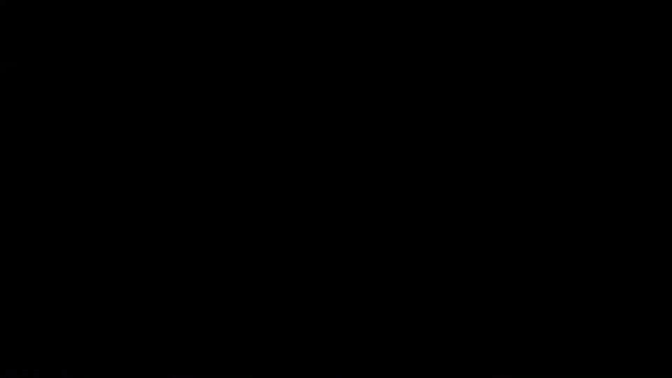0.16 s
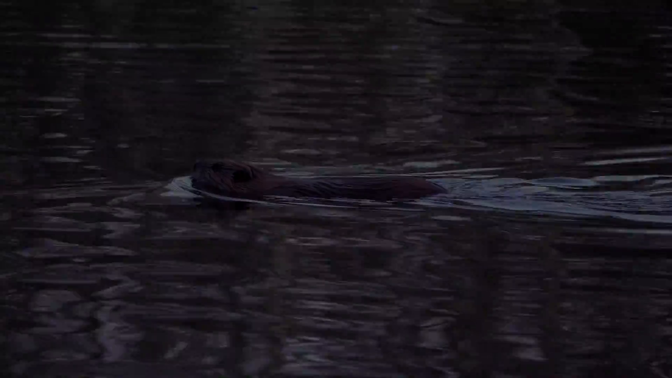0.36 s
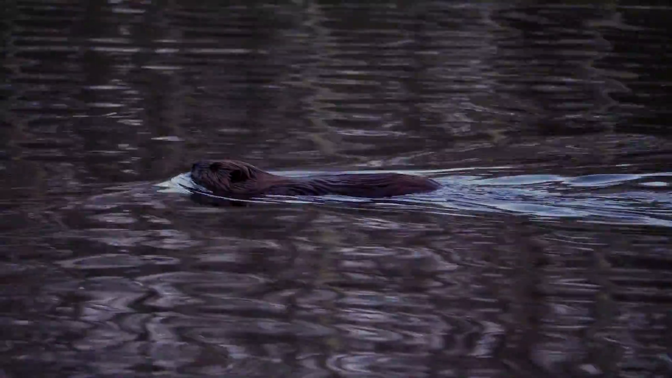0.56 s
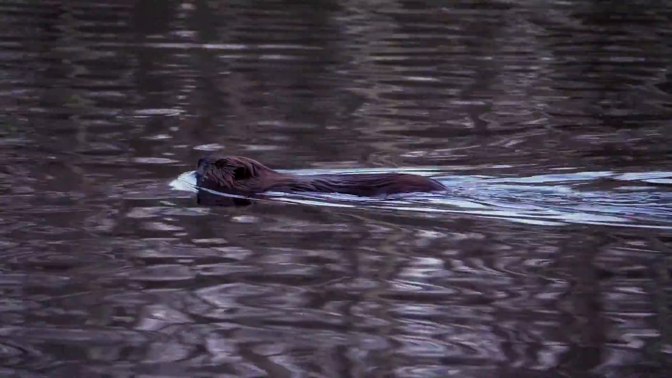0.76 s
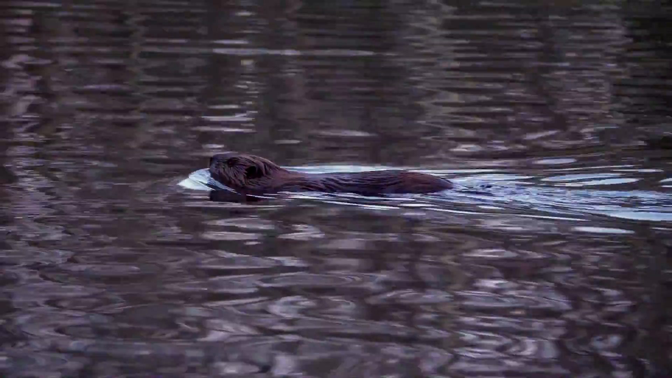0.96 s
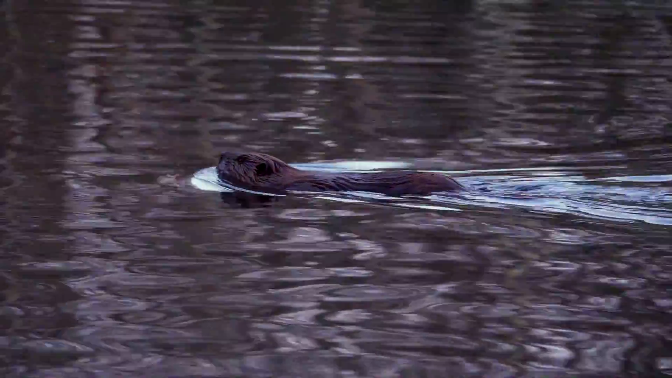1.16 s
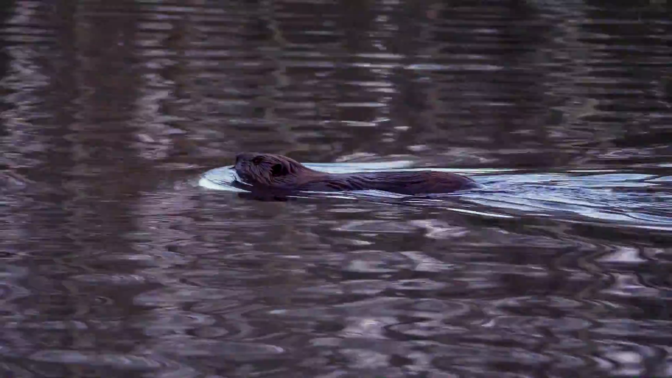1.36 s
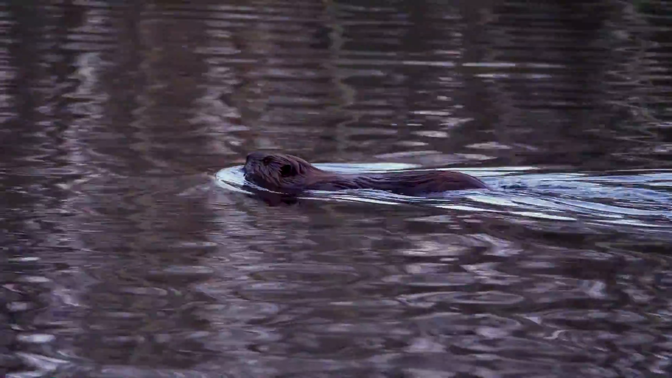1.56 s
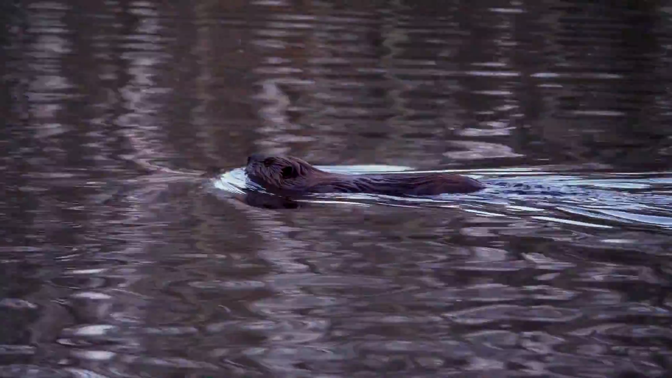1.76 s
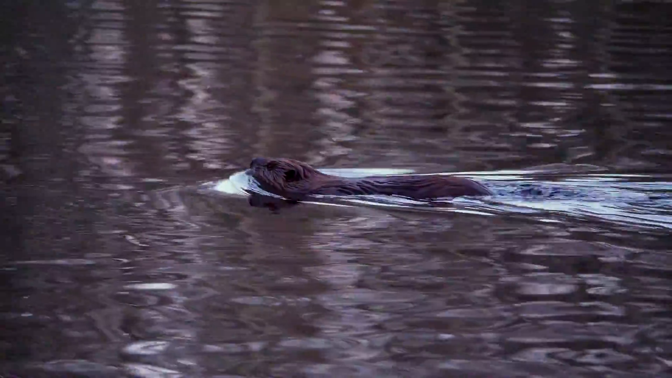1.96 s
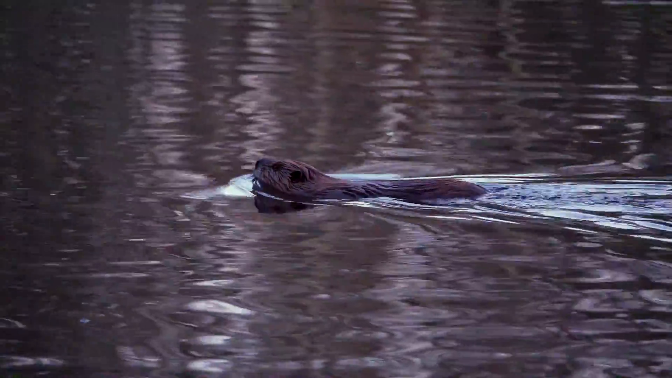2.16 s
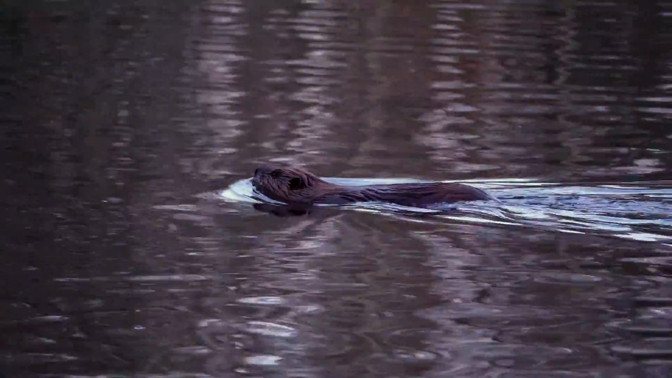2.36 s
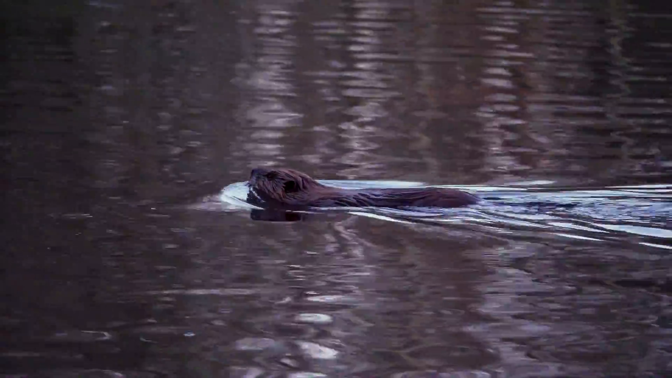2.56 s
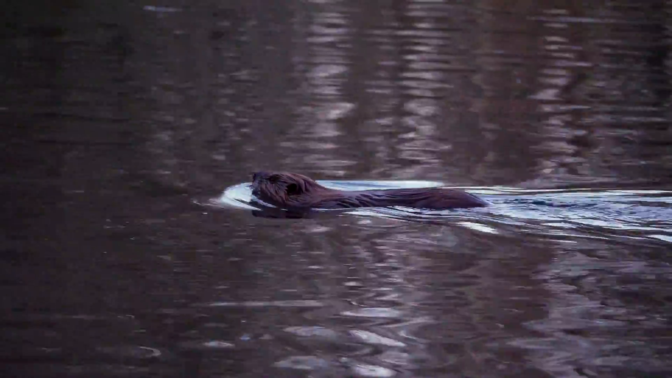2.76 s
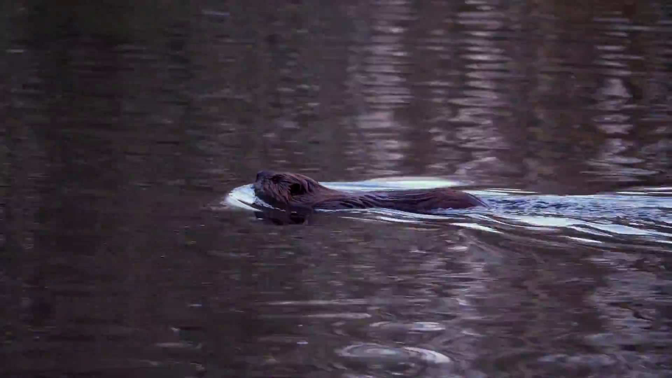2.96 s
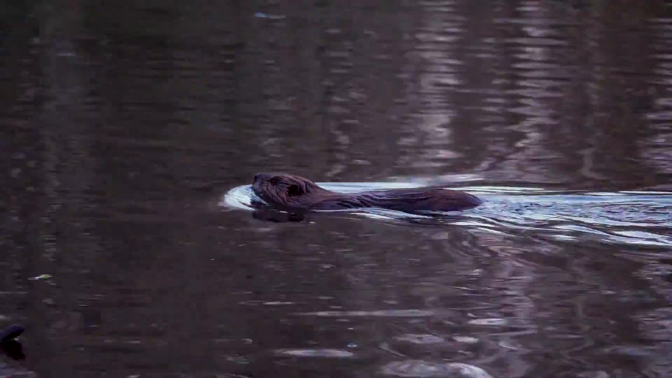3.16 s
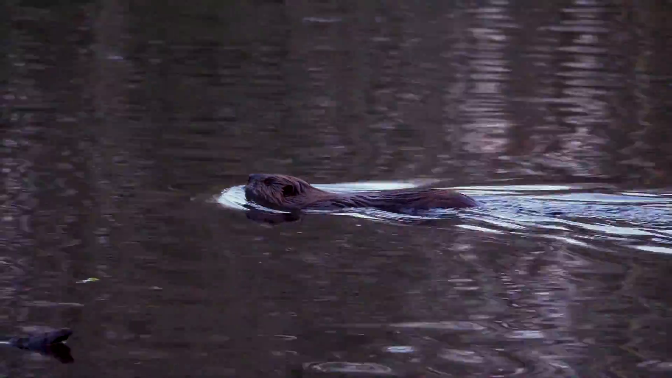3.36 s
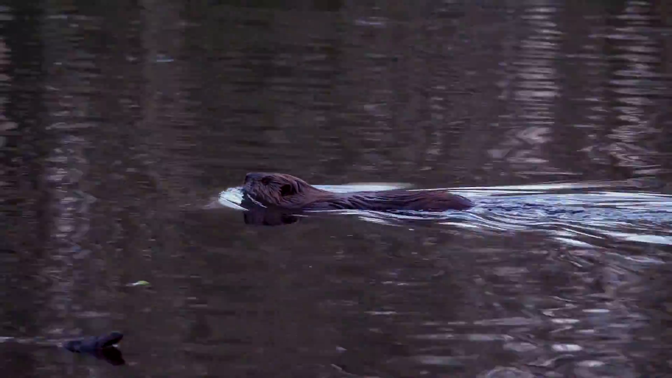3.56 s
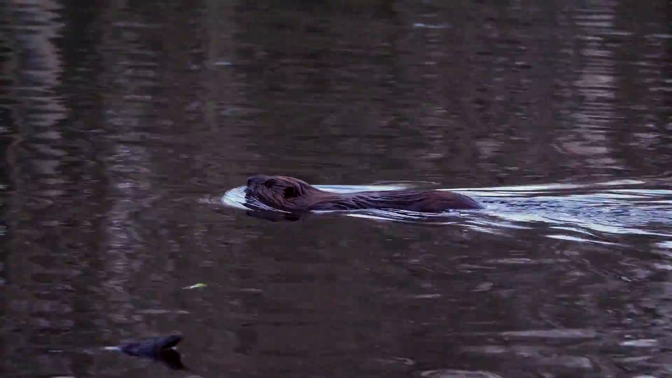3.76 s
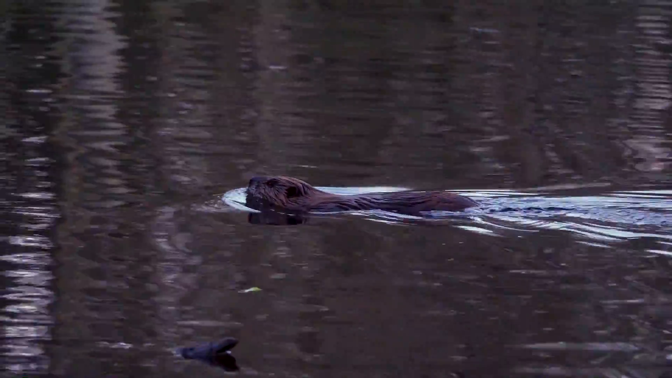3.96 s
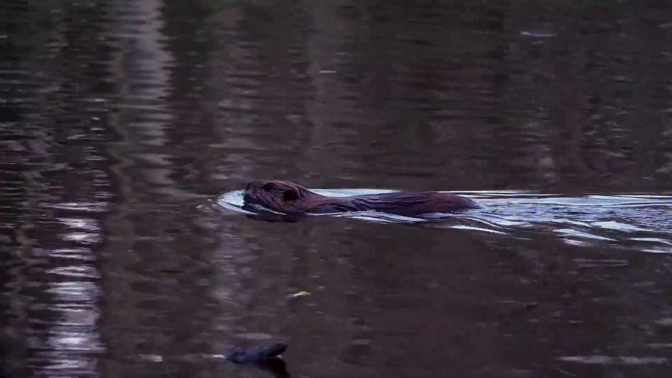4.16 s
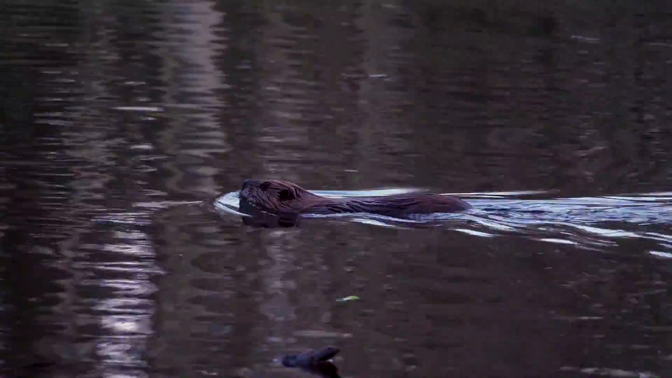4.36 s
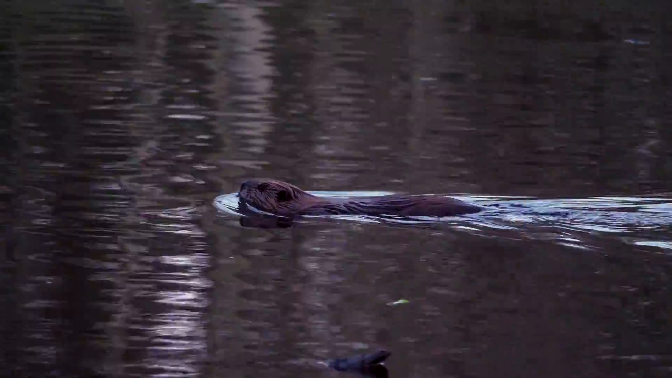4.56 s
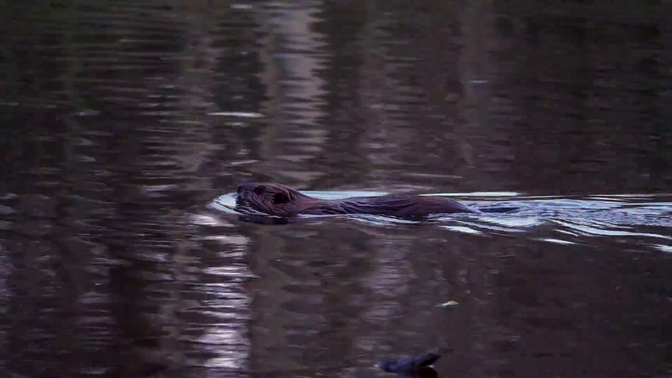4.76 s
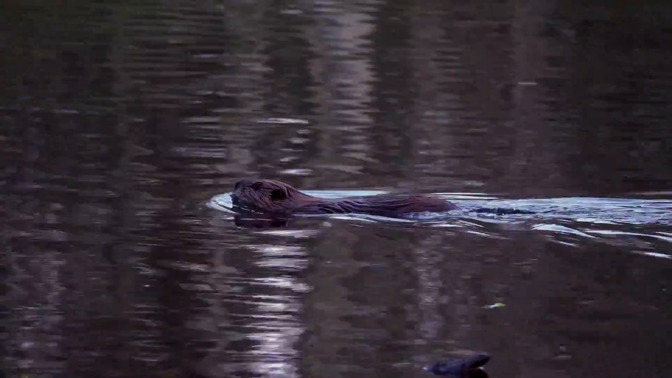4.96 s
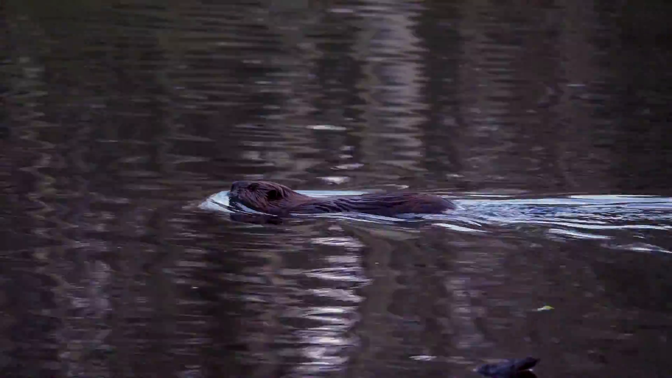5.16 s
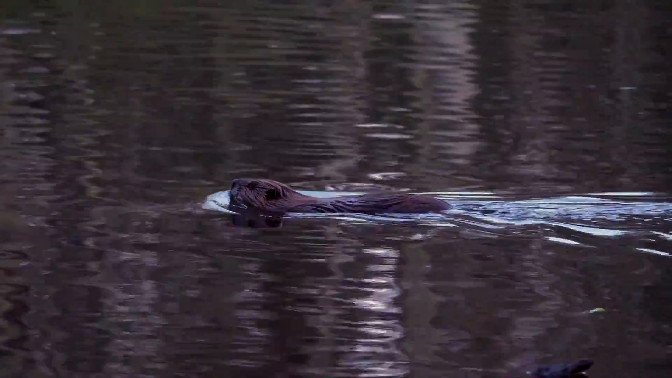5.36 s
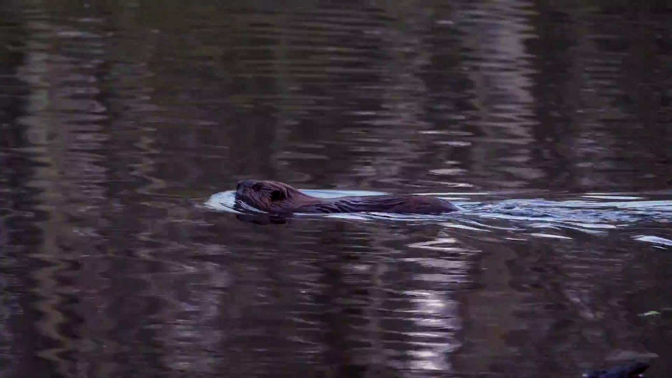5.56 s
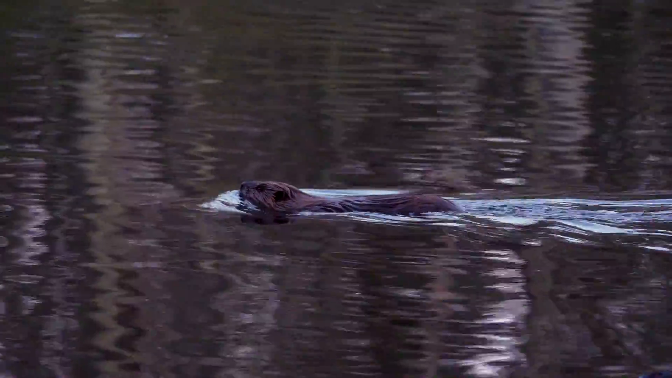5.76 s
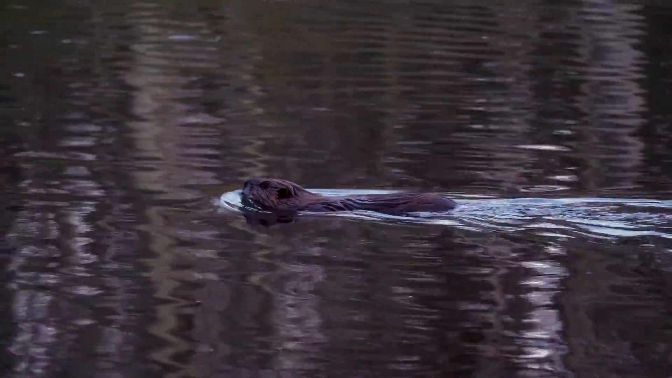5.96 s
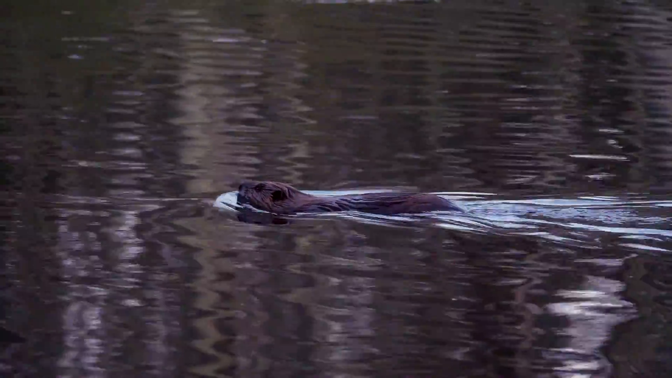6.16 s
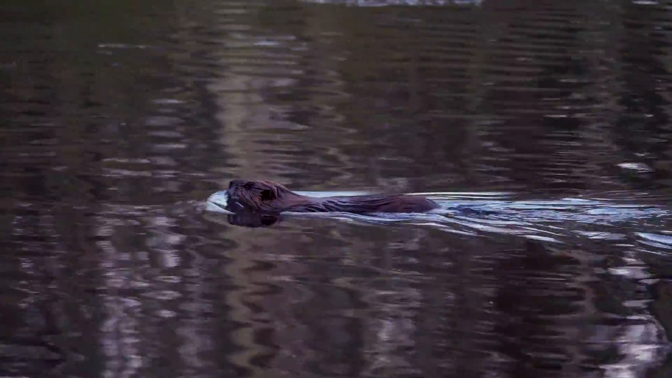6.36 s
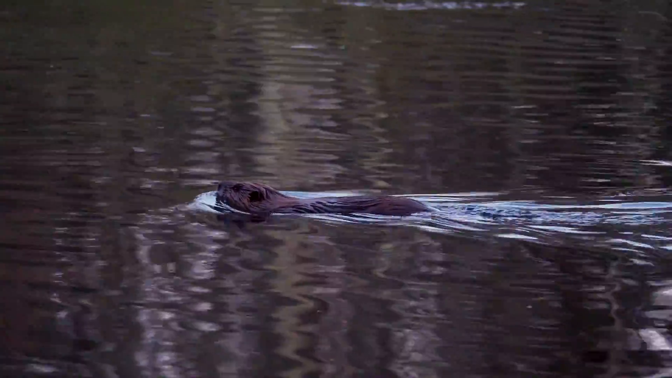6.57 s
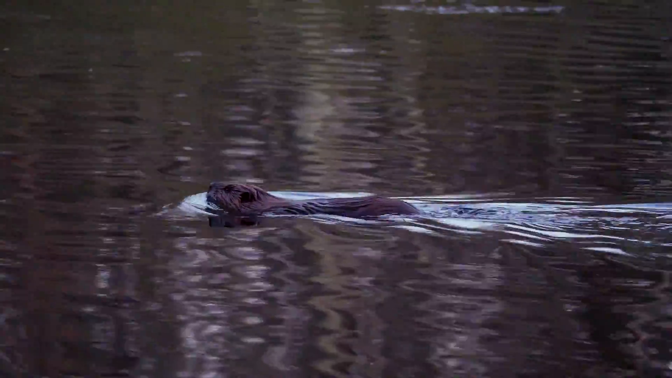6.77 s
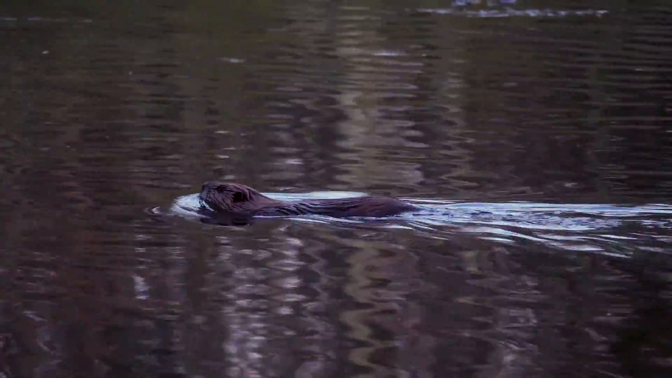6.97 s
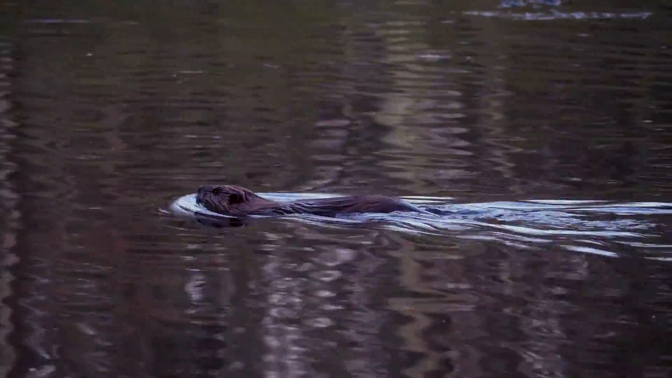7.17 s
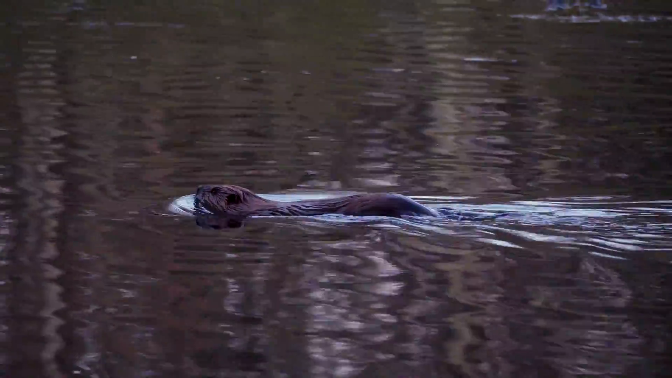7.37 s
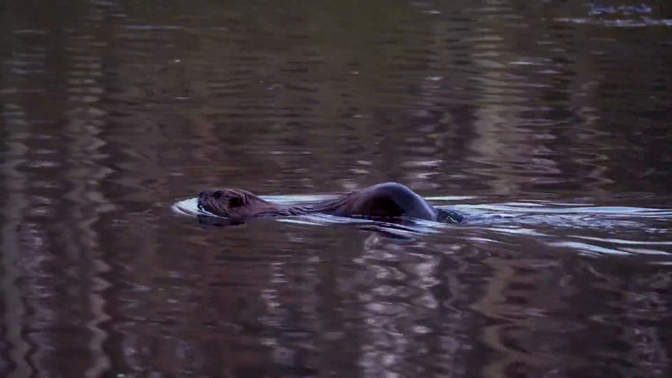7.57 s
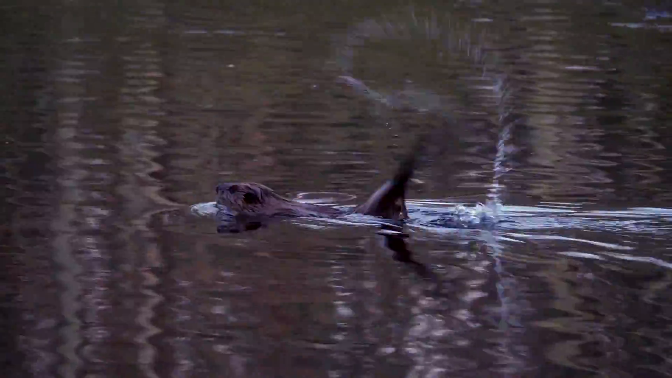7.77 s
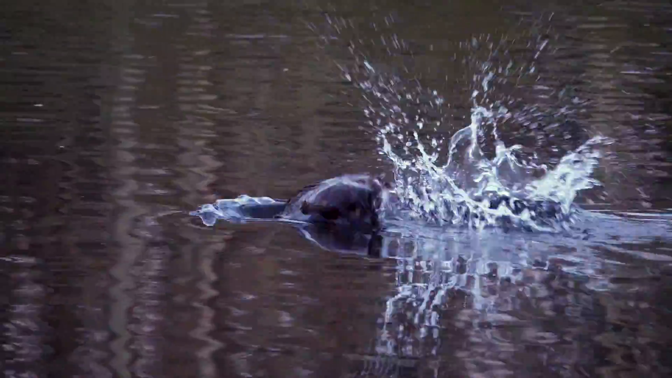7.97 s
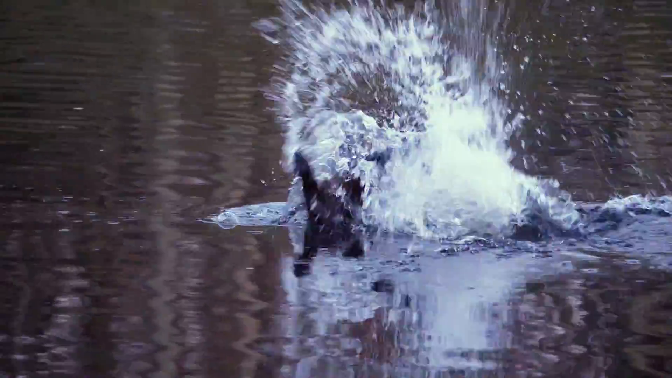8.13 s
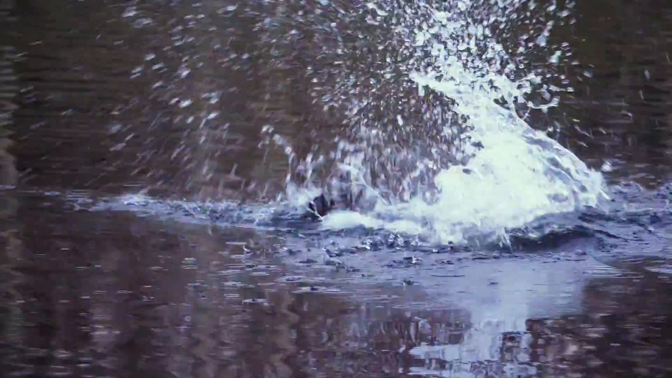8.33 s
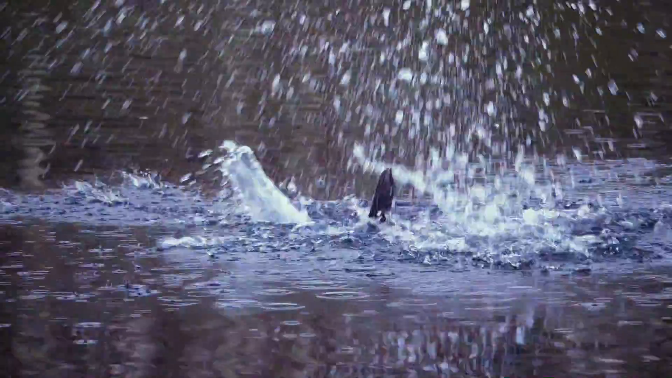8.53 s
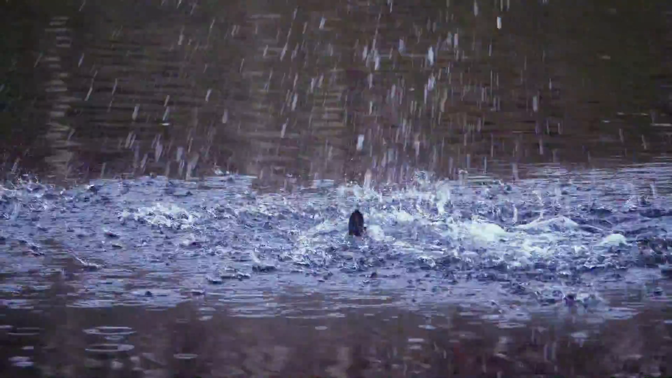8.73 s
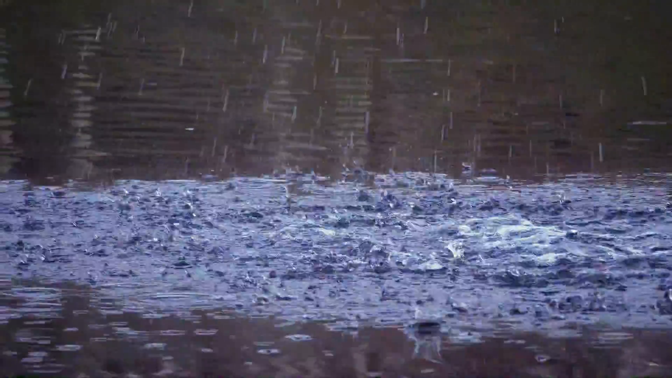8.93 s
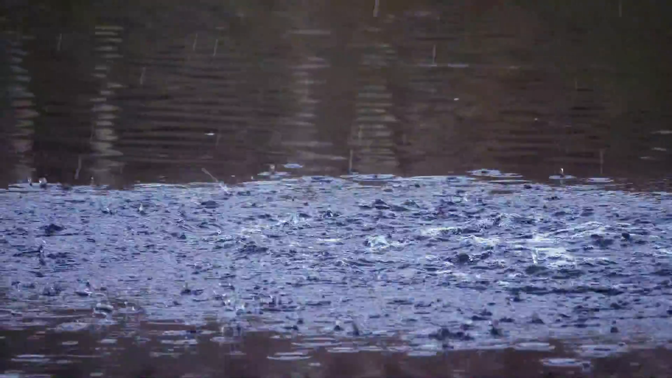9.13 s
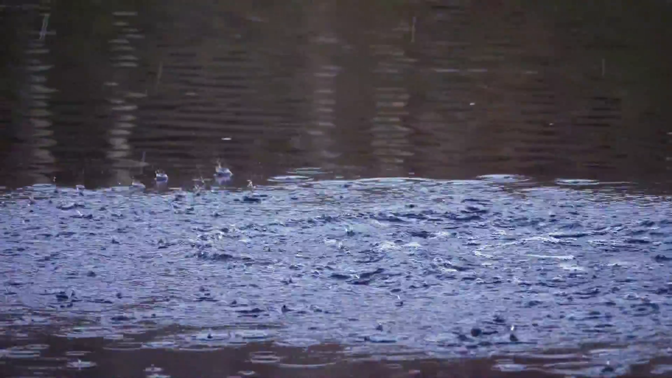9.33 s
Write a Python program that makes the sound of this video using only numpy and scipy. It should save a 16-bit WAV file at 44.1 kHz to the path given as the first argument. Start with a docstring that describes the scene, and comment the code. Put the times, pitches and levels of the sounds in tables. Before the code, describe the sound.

A soft outdoor hush lies over a woodland pond, with faint, lightly echoing birds, mostly to the left. Thin, held whistles sound through the first two seconds, and short reedy phrases come at about 0.7, 2.7, 4.1 and 5.7 seconds. A trill runs from 1.9 to 3.9 seconds, then one long whistle on the right lasts until 5. Three short buzzes, more whistles and a high trill follow between 5.7 and 7.5. Tiny plops dot the quiet. At 7.8 water trickles, and just before 8 a beaver's tail smacks the pond, loud, sharp, near and centred. A low, gulping plunge and a surge of splashing follow at 8.2, then a second loud smack at 8.45. The thrown water rains back in bright drops and bubbles, thinning toward the end at about 9.4 seconds.

```python
"""Beaver on a woodland pond

A beaver lifts its tail, smacks the pond, plunges and smacks again; the thrown water rains back.
Each impact is a burst of spray noise, and trapped air rings as bubbles, the smaller the higher.
Sparrows whistle and trill in nearly pure tones and a thrush pipes in harmonics shaped by throat
and beak. Small plops sound along the bank, and the woods echo it all over a soft outdoor hush."""
import sys
import numpy as np
from scipy import signal
from scipy.fft import rfft, irfft, next_fast_len
from scipy.io import wavfile
from scipy.ndimage import uniform_filter1d

SR = 44100
rng = np.random.default_rng(int(sys.argv[2]) if len(sys.argv) > 2 else 0)


def master(y):
    """Save y as 16-bit WAV."""
    cut = np.clip(np.atleast_2d(y).T, -1, 1)
    pcm = np.round(cut * 32767)  # scale
    wavfile.write(sys.argv[1], SR, pcm.astype(np.int16))


N = 414540


def gain_of(db):
    """Decibels to an amplitude ratio."""
    return 10 ** (np.asarray(db) / 20)


def unit_rms(x):
    """Normalisation to rms 1."""
    return x / np.sqrt(np.mean(x ** 2) + 1e-20)


def wander(n, size):
    """Low-pass noise of rms 1, smooth over size samples."""
    return unit_rms(uniform_filter1d(uniform_filter1d(rng.standard_normal(n), size), size))


def spectrum_at(points, hz):
    """Interpolation on a log-frequency axis."""
    f, value = np.transpose(points)
    return np.interp(np.log(hz + 1), np.log(f + 1), value)


def curves(rows):
    """Linear interpolation of each column, from the first time to the last."""
    times, *columns = np.transpose(rows)
    t = np.arange(times[0], times[-1], 1 / SR)
    return [np.interp(t, times, column) for column in columns]


def add(mix, start, sound):
    """Superposition: a sound joins the mix at start seconds."""
    part = mix[..., round(start * SR):][..., :sound.shape[-1]]
    part += sound[..., :part.shape[-1]]


def placed(x, pan_db):
    """Level and time differences: the nearer side is louder and earlier; positive is left."""
    shift = round(np.clip(1.6 * pan_db, -24, 24)) // 2
    left = np.pad(x, (24 - shift, 24 + shift)) * gain_of(pan_db / 2)
    right = np.pad(x, (24 + shift, 24 - shift)) * gain_of(-pan_db / 2)
    return np.array([left, right])[:, 12:N + 12]


def glide(first, middle, last, u):
    """A parabola through three pitches as u runs from -1 to 1."""
    return middle + (last - first) / 2 * u + ((first + last) / 2 - middle) * u ** 2


def slur(first, middle, last, length, swell):
    """A swept sine: three pitches [Hz], length [s] and the share of it spent swelling."""
    u = np.linspace(-1, 1, round(length * SR))
    envelope = np.sin(np.pi / 2 * np.interp(u, [-1, 2 * swell - 1, 1], [0, 1, 2])) ** .93
    return envelope * np.sin(2 * np.pi * np.cumsum(glide(first, middle, last, u)) / SR)


def bubble(hz, t60, rise, onset_cycles):
    """Bubble resonance: a damped sine whose pitch climbs as it nears the surface."""
    t = np.arange(round(t60 * SR) + 8) / SR
    envelope = (1 - np.exp(-t * hz / onset_cycles)) * gain_of(-60 * t / t60)
    x = envelope * np.sin(2 * np.pi * hz * (t + rise * t ** 2 / t60))
    return x / abs(x).max()


# Background spectrum: (frequency [Hz], relative density [dB])
HUSH_SPECTRUM = [(12, -2), (20, 0), (44, -14), (138, -14), (248, -23), (357, -24.5), (388, -20.5),
                 (542, -24), (2460, -30.5), (2670, -30), (3250, -31.5), (11400, -44.5), (16000, -46)]
# Likeness of left and right: (frequency [Hz], coherence [0-1])
COHERENCE = [(60, 0.83), (180, 0.96), (550, 0.031), (1650, 0.16), (4970, 0.063), (15000, 0.89)]
# Midrange rustle: (time [s], boost [dB])
BREEZE = [(.0, 5), (.6, 3.5), (3.2, 3), (4.2, 2)]


def hush(level_db=-60.5):
    """Partly coherent noise: far wind and water, with faint drifting patches in its spectrum."""
    frames, hz = N // 256 + 5, np.fft.rfftfreq(1024, 1 / SR)
    a, b, c, d, patches = rng.standard_normal((frames, 513, 5)).T
    patches = unit_rms(uniform_filter1d(uniform_filter1d(patches, 12, 0), 20, 1))
    midrange = np.exp(-(np.log((hz + 1) / 800) / 1.3) ** 2)[:, None]
    breeze_db = midrange * np.interp(np.arange(frames) * 256 / SR, *np.transpose(BREEZE))
    coherence = spectrum_at(COHERENCE, hz)[:, None]
    left = a + 1j * b
    right = coherence * left + np.sqrt(1 - coherence ** 2) * (c + 1j * d)
    colour = gain_of(spectrum_at(HUSH_SPECTRUM, hz)[:, None] + 1.32 * patches + breeze_db)
    noise = signal.istft(np.array([left, right]) * colour, nperseg=1024, noverlap=768)[1][:, :N]
    return gain_of(level_db) * noise / np.std(noise.mean(0))


WAVER_DB, WAVER_HZ = 1.6, 7
# Held sparrow notes: (time [s], length [s], first pitch [Hz], middle pitch [Hz], last pitch [Hz],
# level [dB], level change [dB], pan [dB])
WHISTLES = [(0.0, 0.72, 3410, 3380, 3330, -67.5, -9, -5.5), (0.212, .3, 4335, 4302, 4264, -57, 3.5, 19),
            (0.498, .175, 4360, 4340, 4400, -60, 4.5, 18), (1.033, 0.43, 4245, 4240, 4300, -56.5, 1, 18.5),
            (1.607, 0.23, 4262, 4246, 4184, -54.5, -0.8, 19),
            (5.332, 0.089, 3150, 3060, 3130, -64.5, -2, -10),
            (6.405, 0.635, 3365, 3395, 3390, -54, 2, 14.5), (6.112, 0.24, 2030, 1990, 1960, -69, -3, 3),
            (6.753, 0.046, 6330, 6270, 6400, -61, 0.1, 11.5), (7.603, .03, 7600, 6300, 4700, -52, -3, 7.5),
            (6.806, 0.48, 3885, 3910, 3980, -71, -2.5, 22), (7.238, 0.31, 4315, 4270, 4274, -53, -1, 17.5),
            (7.56, 0.15, 4340, 4313, 4370, -55.5, -0.1, 17.5), (7.9, 0.046, 2500, 2750, 3000, -57, 14, 3.5),
            (9.069, 0.18, 2550, 2450, 2360, -55, 1, 3.5)]


def whistles(rise_s=.047, fall_s=.035, slip_hz=59.6, slip_s=.014):
    """Random modulation: the air along the path makes nearly pure notes waver."""
    out = np.zeros((2, N))
    for start, length, first, middle, last, db, change_db, pan_db in WHISTLES:
        t = np.arange(0, length, 1 / SR)
        hz = glide(first, middle, last, 2 * t / length - 1) + WAVER_HZ * wander(len(t), 600)
        hz += slip_hz * (np.exp(-t / slip_s) + np.exp((t - length) / slip_s))  # sharp at both ends
        edges = np.clip(np.minimum(t / rise_s, (length - t) / fall_s), 0, 1) ** 1.14
        level = edges * gain_of(db + change_db * t / length + WAVER_DB * wander(len(t), 800))
        tone = np.sqrt(2) * np.sin(2 * np.pi * np.cumsum(hz) / SR)
        add(out, start, placed(level * tone, pan_db))
    return out


def formant(hz, centre_hz, width_hz):
    """Resonance: the gain falls away on both sides of a centre frequency."""
    return 1 / (1 + (2 * (hz - centre_hz) / width_hz) ** 2) ** 2


# Reedy notes and the faint, rough echo that lingers after them:
# (time [s], length [s], first pitch [Hz], last pitch [Hz], level [dB],
# throat resonance [Hz], throat width [Hz], beak resonance [Hz], beak gain [dB], rasp [0-1])
THRUSH = [(0.706, 0.083, 757, 740, -47, 2840, 1590, 4550, -17.5, 0.24),
          (.78, .3, 802, 790, -62, 1680, 700, 3320, 4, 0.7),
          (.842, 0.23, 850, 791, -42.5, 2540, 900, 6600, -31, .35),
          (2.685, .095, 845, 840, -49, 3250, 1250, 6300, -19, .15),
          (2.765, .2, 815, 754, -54, 3100, 1100, 6500, -14, .4),
          (2.95, .55, 755, 745, -68, 3000, 700, 6300, -40, 1),
          (2.78, .5, 835, 820, -67, 2500, 600, 6300, -40, .8),
          (4.085, .13, 854, 832, -57, 3400, 900, 5370, -10, .4),
          (4.2, 0.2, 830, 750, -57, 3000, 1310, 6300, -16, 0.5),
          (4.39, 0.46, 800, 765, -66.5, 3100, 1300, 6300, -40, 1),
          (5.677, 0.07, 749, 752, -53, 2900, 1280, 4550, -15, 0.1),
          (5.721, .125, 846, 817, -51.5, 1680, 700, 3350, -23, .15),
          (5.806, .19, 855, 830, -50.5, 2530, 1390, 6700, -25.5, .4),
          (5.99, 0.12, 828, 780, -48.5, 2640, 1500, 6300, -25, 0.35),
          (6.293, .15, 767, 765, -65, 2950, 1300, 4600, -25, .4),
          (6.1, 0.24, 841, 830, -67.5, 1680, 700, 2500, -10, 0.64),
          (6.36, 0.42, 855, 860, -64, 1680, 700, 2810, -8, 0.75),
          (6.47, .11, 765, 687, -56, 2660, 1600, 4630, -16, 0.3)]


def thrush(rise_s=.011, fade_db=-7.5, flutter_hz=112, beak_width_hz=1800):
    """Source and filter: throat and beak shape the overtones; fast flutter roughens notes and echo."""
    out = np.zeros(N)
    for start, length, first, last, db, throat_hz, width_hz, beak_hz, beak_db, rasp in THRUSH:
        t = np.arange(0, length, 1 / SR)
        progress = t / length
        scoop = 1 - .0506 * np.exp(-t / .0101)  # the pitch starts flat
        hz = (first + (last - first) * progress ** 1.7) * scoop
        rasp = np.clip(rasp + .23 * progress, 0, 1)
        drift, flutter = uniform_filter1d(rng.standard_normal((2, len(t))), 300)
        phase = 2 * np.pi * np.cumsum(hz * (1 + (.025 + .08 * rasp) * drift)) / SR
        tremolo = 1 + rasp * np.sin(2 * np.pi * np.cumsum(flutter_hz * (1 + 4.3 * flutter)) / SR)
        tone = np.zeros(len(t))
        for k in (2, 3, 4, 6, 7, 8):  # no fundamental
            throat = formant(k * hz, throat_hz, width_hz)
            beak = gain_of(beak_db) * formant(k * hz, beak_hz, beak_width_hz)
            tone += (throat + beak) * np.sin(k * phase)
        level = np.minimum(t / rise_s, 1) * gain_of(db + fade_db * progress ** 2)
        add(out, start, np.sqrt(2) * tremolo * tone * level * signal.windows.tukey(len(t), .1))
    return placed(out, 5.25)


# Plops and ticks along the bank: (time [s], peak level [dB], pitch [Hz], 60 dB decay time [s])
PLOPS = [(0.921, -44, 1950, 0.013), (.939, -44, 1270, 0.026), (0.956, -47, 1470, .04),
         (1.019, -47, 1880, 0.0086), (1.5075, -39, 2280, 0.0034), (1.507, -41, 4250, .006),
         (1.9, -43, 1140, 0.013), (1.96, -55.5, 480, 0.12), (1.965, -55, 1520, 0.082),
         (3.403, -46.5, 1310, 0.017), (3.439, -45, 1100, 0.015), (3.466, -46, 1320, 0.034),
         (3.571, -49.5, 1450, 0.02), (2.23, -54, 477, .06), (5.26, -54.5, 550, .05),
         (7.313, -55, 1040, 0.018)]


def plops():
    """Damped oscillation: single bubbles ring near the shore."""
    out = np.zeros(N)
    for start, db, hz, t60 in PLOPS:
        add(out, start, gain_of(db) * bubble(hz, t60, rise=.08, onset_cycles=.14))
    return placed(out, .3)


def varied(shape):
    """Jitter and shimmer: a slur a little off in pitch and strength."""
    pitch, strength = rng.standard_normal(2)
    pitches = np.multiply(shape[:3], 1 + .012 * pitch)
    return gain_of(1.2 * strength) * slur(*pitches, *shape[3:])


WARM_UP_DB = -4.5  # a trill starts soft; the shortfall halves with each beat
# Slurs: (first pitch [Hz], middle pitch [Hz], last pitch [Hz], length [s], swelling share [0-1])
FLICK, FALL = (4270, 4640, 5130, .025, .36), (6900, 4320, 3440, .051, .33)
ARCH = (4200, 5150, 4450, .07, .12)


def low_trill(start_s=1.878, beat_s=.1395, beats=14, tires_s=2.82):
    """Paired frequency sweeps: a flick leads each fall; they slow, and fade once the bird tires."""
    out = np.zeros((2, N))
    for k in range(beats):
        onset = start_s + beat_s * k + .00041 * k ** 2 + .001 * rng.standard_normal()
        tired_s = max(onset - tires_s, 0)
        uneven_db = 3.1 * unit_rms(uniform_filter1d(rng.standard_normal(len(slur(*FALL))), 200))
        fall_db = -50.5 + WARM_UP_DB / 2 ** (k + 1) - 14 * tired_s + uneven_db
        flick_db = -46 + WARM_UP_DB / 2 ** k - 9.5 * tired_s
        flick = FLICK if k < beats - 1 else ARCH
        add(out, onset, placed(gain_of(fall_db) * varied(FALL), 12))
        add(out, onset - .045, placed(gain_of(flick_db) * varied(flick), 10.4))
    return out


# Contour of one long note: (time [s], pitch [Hz], level [dB])
LONG_WHISTLE = [(4.085, 2770, -73), (4.108, 2685, -57), (4.15, 2655, -50), (4.31, 2718, -47.5),
                (4.44, 2715, -47.5), (4.52, 2670, -51), (4.61, 2695, -49.5), (4.7, 2645, -50),
                (4.962, 2649, -48.5), (5.0, 2680, -59), (5.05, 2660, -70)]


def long_whistle():
    """Frequency and amplitude modulation: one sustained tone wavers on the right."""
    out = np.zeros((2, N))
    hz, db = curves(LONG_WHISTLE)
    phase = 2 * np.pi * np.cumsum(hz + WAVER_HZ * wander(len(hz), 900)) / SR
    level = np.sqrt(2) * gain_of(db + WAVER_DB * wander(len(hz), 900))
    add(out, LONG_WHISTLE[0][0], placed(level * np.sin(phase), -13))
    return out


# Buzzing calls: (time [s], level of the second stroke [dB])
BUZZES = [(5.751, -53.5), (6.156, -50), (6.55, -50)]


def buzzes(period_s=.015, fade_db=2.4):
    """Pulse trains: eight rising strokes, fading after the second, fuse into a buzz."""
    out = np.zeros((2, N))
    stroke = slur(4100, 5050, 5720, length=.02, swell=.55)
    for start, db in BUZZES:
        for k in range(8):
            stroke_db = db - fade_db * abs(k - 1) + 2.2 * wander(len(stroke), 60)
            add(out, start + period_s * k, placed(gain_of(stroke_db) * stroke, 8.52))
    return out


def high_trill(start_s=6.796, beat_s=.077, beats=7, tires_s=7.05):
    """Alternating frequency sweeps: a fall follows each rise, slowing and at last fading."""
    out = np.zeros((2, N))
    rise = slur(6300, 6950, 7950, length=.036, swell=.55)
    fall = slur(5950, 5600, 4250, length=.022, swell=.6)
    for k in range(beats):
        onset = start_s + beat_s * k + .0008 * k ** 2
        tired_s = max(onset - tires_s, 0)
        rise_db = -53.5 + WARM_UP_DB / 2 ** (k + 1) - 19 * tired_s
        fall_db = -50 + WARM_UP_DB / 2 ** k - 42 * tired_s
        add(out, onset, placed(gain_of(rise_db) * rise, 12))
        add(out, onset + .04, placed(gain_of(fall_db) * fall, 9))
    return out


# Single calls: (time [s], peak level [dB])
CHIRPS = [(7.441, -54), (7.732, -56)]


def chirps():
    """Frequency sweep: each call is one short upward glide."""
    out = np.zeros((2, N))
    for start, db in CHIRPS:
        add(out, start, placed(gain_of(db) * slur(1900, 2400, 2730, length=.045, swell=.64), .3))
    return out


# Thickness of the shower: (time [s], drop rate [factor], share of dense churning [0-1])
SHOWER = [(7.76, 0.56, .4), (7.96, 1.16, .7), (8.2, 1.33, .5), (8.6, 1.1, .44), (8.9, 0.65, .33),
          (9.1, 0.4, .33), (9.4, 0.3, .33)]
# The microphone's tone on the splash, bright near 9.5 kHz, dull above: (frequency [Hz], gain [dB])
MIC_COLOUR = [(1200, -1.04), (2200, 2.5), (3500, 0.6), (6000, -1.5), (9500, 5.5), (12500, 0.5),
              (15500, -14)]
# Falling water as the tail drains, smacks throw spray, the body plunges and the pond settles:
# (peak time [s], 20 dB swell [s], 20 dB decay [s], level [dB], centre [Hz], -6 dB half-width [octaves])
SURGES = [(7.79, .03, 1, -66, 800, 2.5), (7.835, .04, 0.1, -61.5, 2500, 2.2),
          (7.91, 0.14, 0.5, -62, 500, 1.5), (7.96, 0.02, 0.1, -48, 2200, 1.6),
          (7.99, .03, .45, -56.5, 1820, 1.86), (8.03, .5, .6, -60, 330, 0.8),
          (8.13, 0.01, 0.1, -46, 1200, 1.4), (8.184, 0.0442, 0.2765, -37.5, 910, 1.4),
          (8.25, 0.0938, 0.07, -39.5, 1100, 1.4), (8.21, 0.07, 0.67, -49, 6940, 1),
          (8.37, 0.18, 0.4, -48, 1700, 1.3), (8.44, .02, .08, -48, 11000, .8),
          (8.468, .06, 0.07, -42.5, 2000, 2), (8.5, 0.9, .9, -60, 140, 1.0),
          (8.6, .25, 0.43, -44, 1400, 1.1), (8.8, 0.41, .4, -46, 3100, 0.97),
          (8.86, 0.72, 0.75, -52, 9500, 1.05), (9.25, 0.2, .5, -62, 750, .7)]


def splash(ticks_per_s=350, climb_s_per_octave=.0012):
    """Shot noise through resonators: each drop size rings its own bubble, the small many and short."""
    out = np.zeros((2, N))
    density, churn = curves(SHOWER)
    n = len(density)
    t = SHOWER[0][0] + np.arange(n) / SR
    coarse_t = t[::32]
    peak, swell, decay, top_db, centre_hz, octaves = np.transpose(SURGES)[:, :, None]
    below_peak_db = 20 * np.maximum((peak - coarse_t) / swell, (coarse_t - peak) / decay)
    surge_power = gain_of(top_db - below_peak_db) ** 2
    sheets = gain_of(1.45 * wander(n, 500))  # water lands in sheets
    sides = rng.choice([-1., 1.], n)
    sizes = gain_of(3 * np.minimum(rng.exponential(1, n), 4))  # a few drops are large
    tick_chance = density * ticks_per_s / SR
    ticks = (rng.random(n) < tick_chance) * sizes * rng.choice([-1., 1.], n)
    ticks /= np.sqrt(tick_chance * np.mean(sizes ** 2))
    for hz in np.exp(np.arange(np.log(130), np.log(15000), 1 / 8)):
        share = gain_of(-6 * (np.log2(hz / centre_hz) / octaves) ** 2) ** 2
        level = np.interp(t, coarse_t, np.sqrt(share[:, 0] @ surge_power))
        level *= gain_of(spectrum_at(MIC_COLOUR, hz)) * sheets
        chance = density * 60 * (hz / 1000) ** .5 / SR
        drops = (rng.random(n) < chance) * np.roll(sizes, rng.integers(n))
        drops /= np.sqrt(chance * np.mean(sizes ** 2))
        # ticks reach the higher bands later, so each sweeps upward
        band_ticks = np.roll(ticks, round(climb_s_per_octave * SR * np.log2(hz / 8000)))
        tick_share = .5 / (1 + (2500 / hz) ** 2)
        impacts = np.sqrt(1 - tick_share) * drops + np.sqrt(tick_share) * band_ticks
        water = np.sqrt(1 - churn) * impacts + np.sqrt(churn) * rng.standard_normal(n)
        # the finest mist scatters widest
        aside = gain_of(-19.5 + 11 * np.log2(hz / 12000)) * np.roll(sides, rng.integers(n))
        stereo = level * water * np.array([1 + aside, 1 - aside])
        cycles = 16 * (hz / 1000) ** -.2
        ring = bubble(hz, cycles / hz, rise=.14, onset_cycles=.94)
        add(out, t[0], signal.oaconvolve(stereo, ring[None] / np.linalg.norm(ring), axes=1))
    return out


# Air trapped by tail and body: (time [s], level [dB], pitch [Hz], 60 dB decay time [s])
AIR_POCKETS = [(7.782, -44, 2280, 0.022), (7.817, -48.5, 440, 0.1), (7.83, -43, 950, 0.046),
               (7.88, -41, 1340, 0.051), (7.9459, -11, 2800, .005), (7.9464, -15, 3700, .005),
               (7.9467, -4.5, 1500, .006), (7.9465, -22, 380, .03), (7.9495, -17, 950, .008),
               (7.9546, -15, 1250, .004), (7.9552, -10.5, 900, .006), (8.124, -35, 1010, 0.033),
               (8.143, -30.5, 620, 0.035), (8.15, -35, 160, 0.054), (8.173, -31.5, 125, .06),
               (8.225, -27, 362, .04), (8.305, -42, 151, 0.23), (8.179, -22, 315, 0.023),
               (8.221, -24, 894, 0.036), (8.4475, -24, 1950, 0.0073), (8.453, -32.5, 152, .09),
               (8.4546, -22, 360, 0.022), (8.4549, -9, 571, 0.017), (8.4556, -8, 1700, 0.0082),
               (8.4568, -7.5, 2000, 0.01), (8.4562, -17, 1100, .01), (8.4572, -13, 3300, 0.0066),
               (8.726, -23.5, 1560, .015), (8.748, -20, 1990, 0.011), (8.765, -29, 1690, 0.017),
               (8.7525, -22, 2300, .01), (8.8125, -25, 1900, .014), (8.91, -37, 870, 0.13),
               (8.555, -29, 1550, .03), (8.581, -28, 1300, .035), (8.624, -28, 960, .035),
               (8.957, -30, 1900, .015), (8.97, -47, 560, .12), (9.215, -40, 1510, 0.015),
               (9.3, -51.5, 596, 0.19)]


def air_pockets():
    """Cavity resonance: pockets ring as they close and radiate little below their pitch."""
    out = np.zeros(N)
    for start, db, hz, t60 in AIR_POCKETS:
        slowness = max(1, hz * t60 / 14)  # long rings swell softly and climb less
        ring = bubble(hz, t60, rise=.35 / slowness ** .5, onset_cycles=.35 * slowness)
        high_pass = signal.butter(2, hz / 2.5, "high", fs=SR)
        add(out, start, gain_of(db) * signal.lfilter(*high_pass, ring))
    return out


# The largest single drops: (time [s], level [dB], middle pitch [Hz])
DROPS = [(7.8287, -40, 4200), (8.2325, -29, 11500), (8.334, -28, 8800), (8.3505, -31, 12000),
         (8.4385, -26, 11000), (8.8625, -27, 3900), (8.3795, -20, 8400), (8.5448, -31, 8290),
         (8.632, -26, 3540), (8.779, -28, 4100), (8.8313, -29, 8400), (8.843, -27, 5340),
         (8.858, -30, 7500), (8.878, -26, 4440), (8.914, -31, 10500), (8.9291, -31, 9250),
         (8.9595, -29, 3800), (8.989, -30, 9210), (9.0075, -32, 10500), (9.016, -26, 8900),
         (9.0204, -24, 5600), (9.0515, -33, 8000), (9.0685, -34, 2300), (9.0916, -28, 8800),
         (9.143, -36, 6200), (9.1478, -30, 6700), (9.175, -26, 9200), (9.1805, -31, 10500),
         (9.185, -29, 10000), (9.19, -30, 10500), (9.1957, -30, 9800), (9.232, -34, 9350),
         (9.2667, -35, 10800), (9.301, -33, 11300), (9.306, -34, 7690), (9.32, -33, 9340),
         (9.3697, -28, 9700), (9.3757, -35, 11500), (9.3785, -28, 9800), (9.3855, -39, 11000),
         (9.3908, -40, 11000)]


def large_drops(length_s=.0028, lead_s=.0001):
    """Swept resonance: each drop chirps upward through its ringing pitch."""
    out = np.zeros(N)
    for start, db, hz in DROPS:
        chirp = slur(.55 * hz, hz, 1.3 * hz, length_s, swell=.36)
        add(out, start - lead_s, gain_of(db) * chirp * signal.windows.hann(len(chirp)))
    return out


# Bursts of spray: (time [s], level [dB], length [s])
SMACKS = [(7.9442, -27, .003), (7.9462, -20, .005), (7.9495, -21, .0078), (8.177, -36, .02),
          (8.4545, -19, .0062)]
# Their spectrum: (frequency [Hz], relative density [dB])
SMACK_SPECTRUM = [(120, -53), (200, -15), (387, -12), (647, -8.5), (1020, -35), (1870, -4.5), (6520, -13.5),
                  (11300, -11.5), (16000, -29)]


def tail_smacks():
    """Impact noise: the flat tail meets the water in brief broadband bursts."""
    out = np.zeros(N)
    colour = gain_of(spectrum_at(SMACK_SPECTRUM, np.fft.rfftfreq(2048, 1 / SR)))
    for start, db, length in SMACKS:
        spray = unit_rms(irfft(rfft(rng.standard_normal(2048)) * colour))[:round(length * SR)]
        add(out, start, gain_of(db) * spray * signal.windows.tukey(len(spray), .4))
    return out


def plunge(start_s=8.22, level_db=-25):
    """Cavity collapse: the hollow behind the diving body shrinks, so its pitch climbs."""
    out = np.zeros(N)
    add(out, start_s, gain_of(level_db) * slur(72, 127, 180, length=.047, swell=.4))
    return out


def echoes(x, t60, wet_db, delay_s=.02):
    """Reverberation: sparse random reflections off trunks and banks, different for each ear."""
    slots = np.arange(round(delay_s * SR), SR, 20)
    arrivals = slots + rng.integers(0, 20, (2, len(slots)))
    strengths = rng.choice([-1., 1.], arrivals.shape) * gain_of(-60 * arrivals / SR / t60)
    response = np.zeros((2, SR + 20))
    np.put_along_axis(response, arrivals, strengths, axis=1)
    response *= gain_of(wet_db) / np.linalg.norm(response[0])
    size = next_fast_len(N + SR + 20, real=True)
    return x + irfft(rfft(x, size) * rfft(response, size), size)[:, :N]


def scene():
    """Direct-to-reverberant ratio: far birds and plops echo more than the near, central beaver."""
    woods = echoes(whistles() + long_whistle(), t60=1.9, wet_db=-15)
    woods += echoes(buzzes(), t60=.9, wet_db=-7)
    woods += echoes(low_trill() + high_trill() + chirps() + plops(), t60=1.4, wet_db=-4.5, delay_s=.025)
    woods += echoes(thrush(), t60=.87, wet_db=-7.5)
    beaver = placed(air_pockets() + tail_smacks() + plunge(), .11)
    water = echoes(beaver + splash() + large_drops(), t60=.44, wet_db=-20.5, delay_s=.012)
    return woods + water + hush()


def record(dry):
    """Band limiting: a low-pass filter removes the treble above 16 kHz."""
    low_pass = signal.firwin(511, 16000, window=("kaiser", 9), fs=SR)
    return signal.oaconvolve(dry, low_pass[None], "same")


dry = scene()
out = record(dry)
master(out)
```